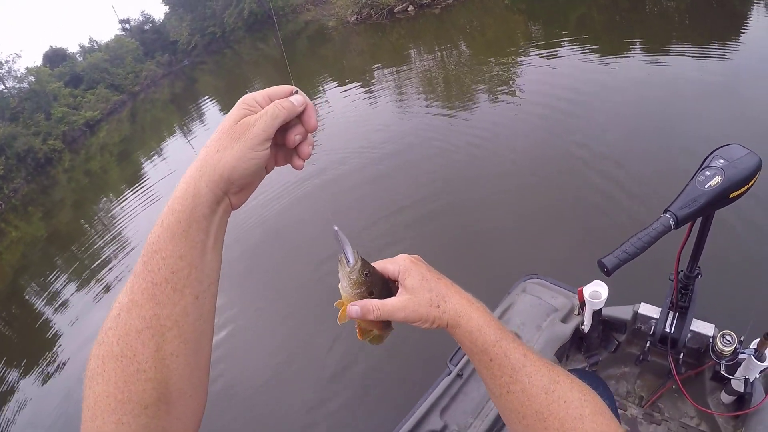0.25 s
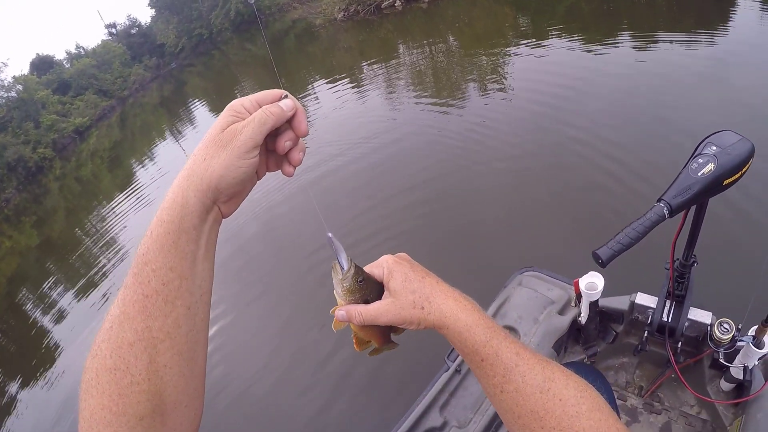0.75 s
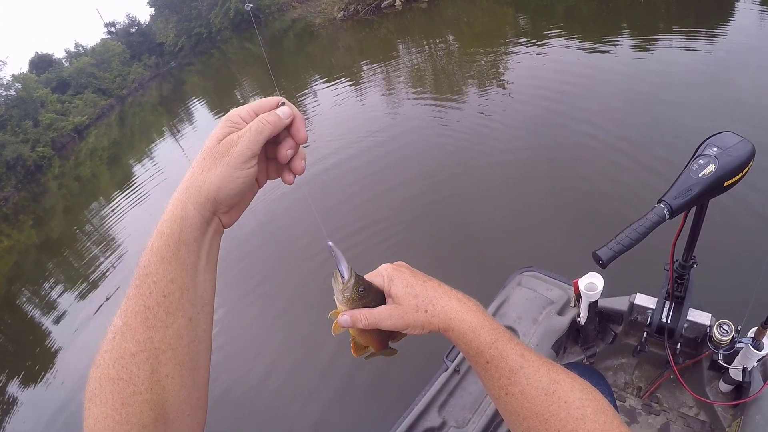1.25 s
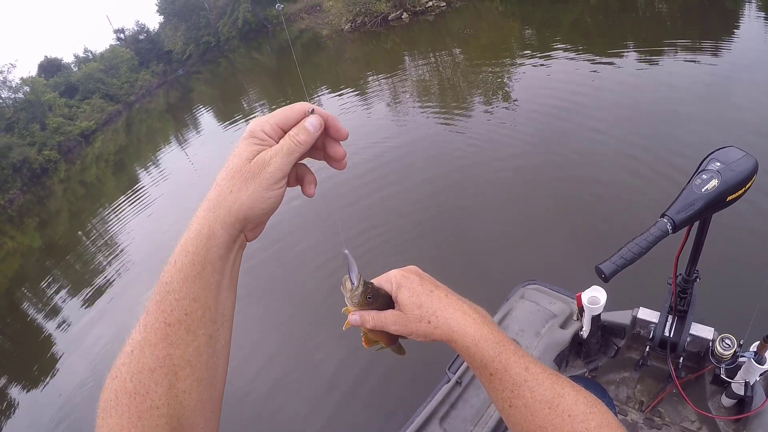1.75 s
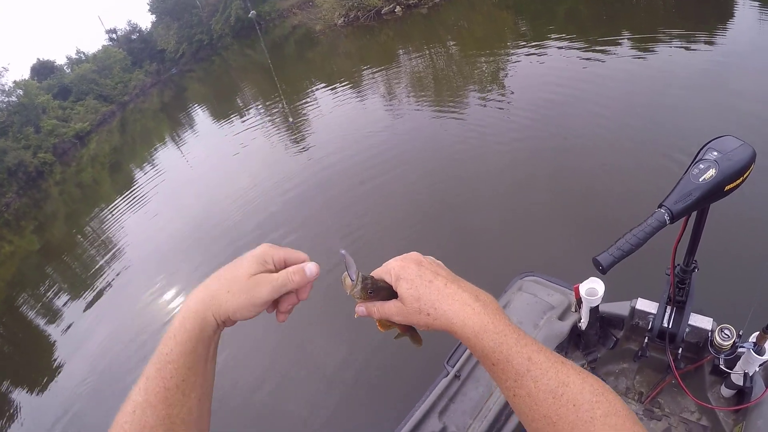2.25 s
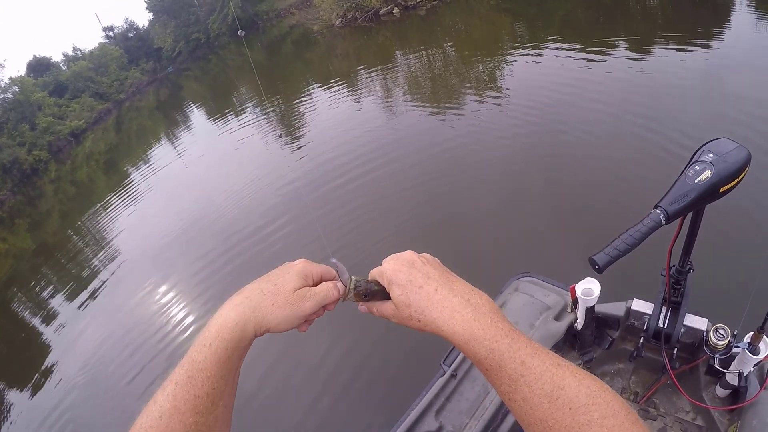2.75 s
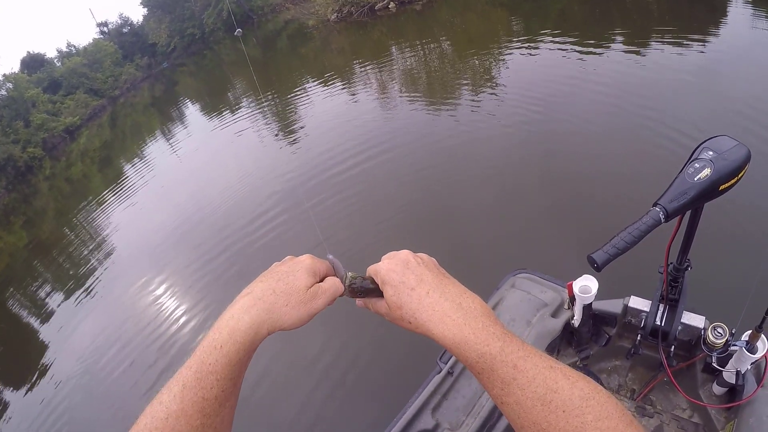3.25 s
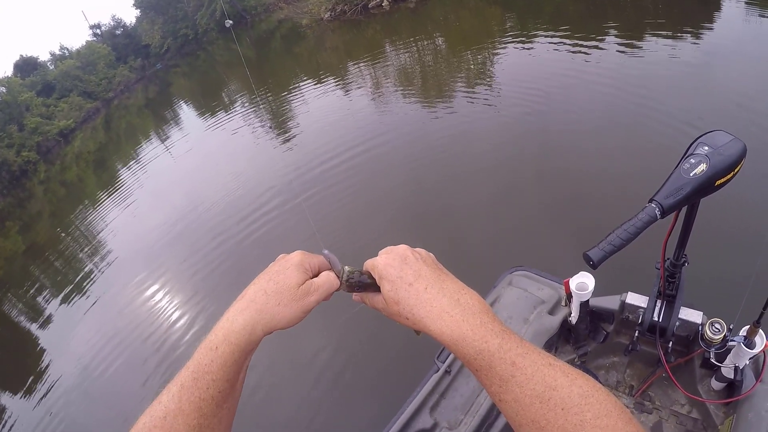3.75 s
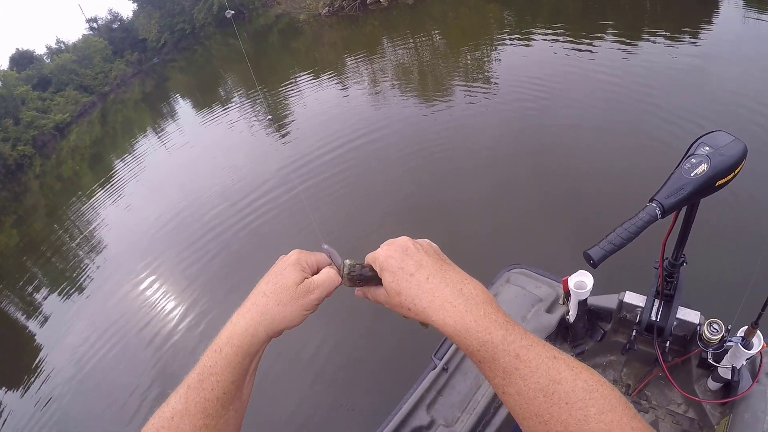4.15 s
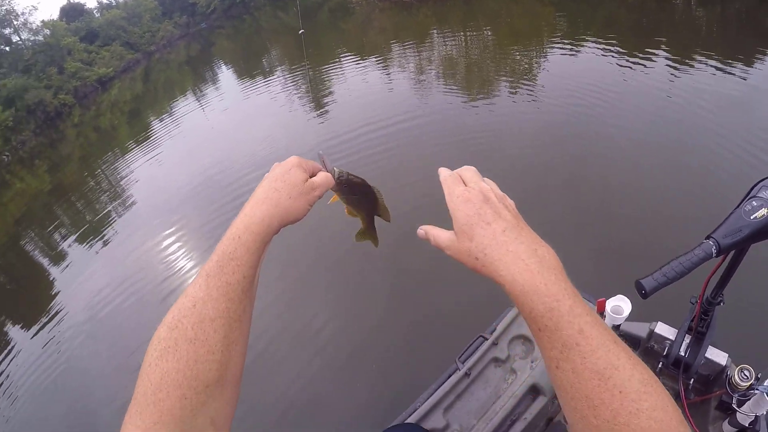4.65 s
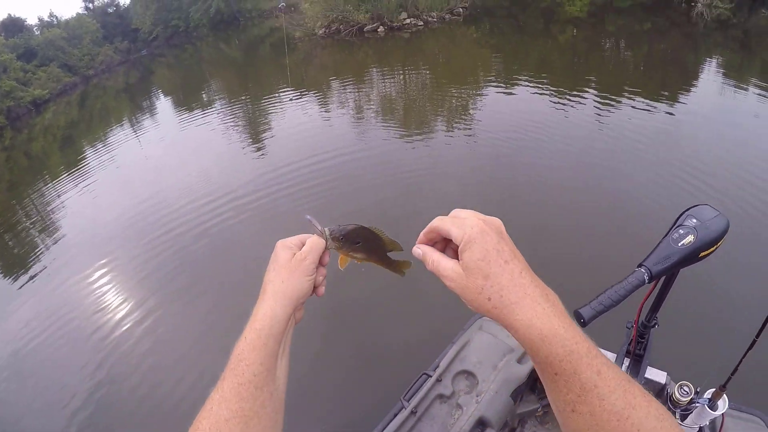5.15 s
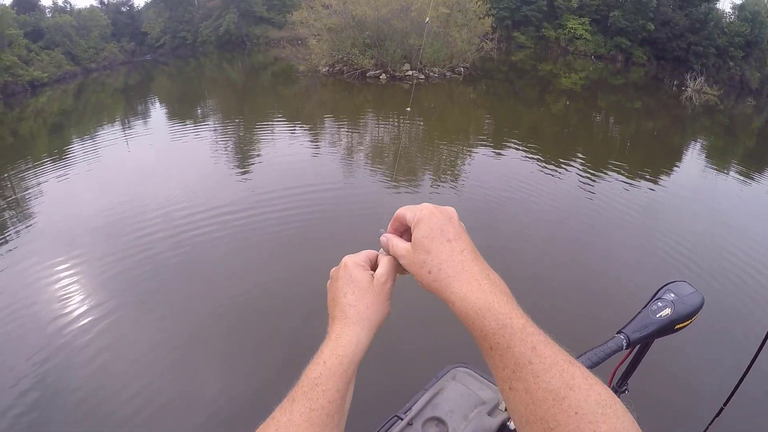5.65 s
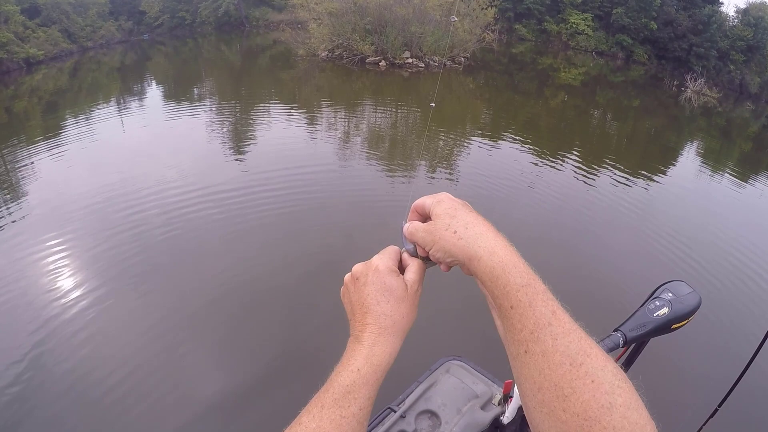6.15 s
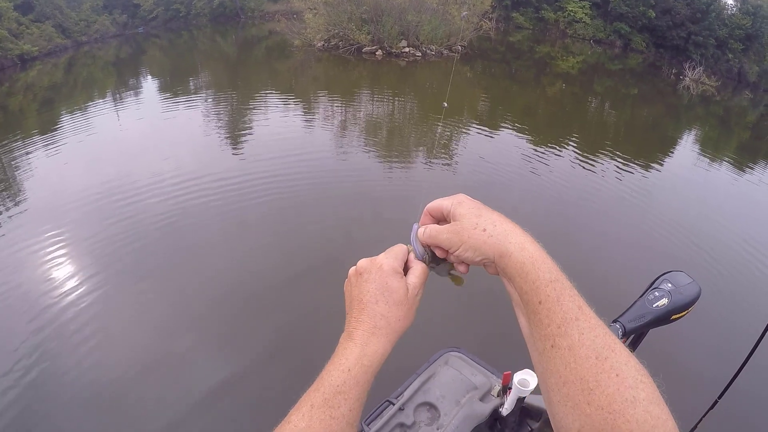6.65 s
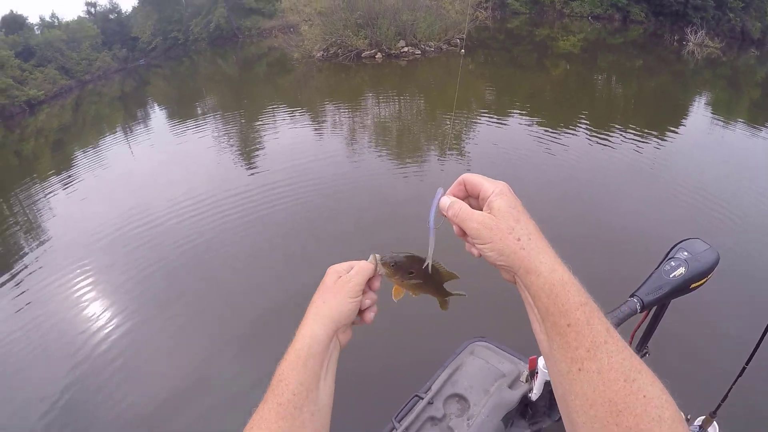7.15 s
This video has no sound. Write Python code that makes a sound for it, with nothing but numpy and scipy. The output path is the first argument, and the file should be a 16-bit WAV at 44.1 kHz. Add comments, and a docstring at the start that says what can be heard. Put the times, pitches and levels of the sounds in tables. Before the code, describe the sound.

On a still river, a shimmering high insect chorus and constant bass rumble surround sparse tackle clicks, soft wet pats and faint birdsong.

```python
"""A still river in summer, heard from a small boat: a steady drone of cicadas in the bank trees.
Dense random clicks excite the cicadas' body resonances; filtered noise gives a far low rumble and hiss.
Wet hands on a fish, hook and tackle pat, click and rub as decaying rings, noise snaps and soft grains.
Distant birds whistle and chip as gliding sines, and a hoarse call is a tone broken up by narrow noise.
A small camera adds steady tones and a wavering whine built from three harmonics."""
import sys
import numpy as np
from scipy import signal
from scipy.fft import rfft, irfft, next_fast_len
from scipy.io import wavfile

SR = 44100
rng = np.random.default_rng(int(sys.argv[2]) if len(sys.argv) > 2 else 0)


def level_to_linear(level):
    """Convert decibel levels to linear amplitude factors, elementwise."""
    exponent = np.asarray(level, float) / 20
    return 10 ** exponent


def store_wav(level_fs):
    """Save 16-bit WAV to argv[1]."""
    pcm = np.round(np.clip(np.atleast_2d(level_fs), -1, 1) * 32767)
    wavfile.write(sys.argv[1], SR, pcm.T.astype(np.int16))


N = 325458

# Levels in the tables apply ahead of echoes and of the sensitivity of the microphone ports.
# Cicada crowds, each tuned alike: f/Hz, width of one resonance/Hz, level/dB, left minus right/dB
CICADA_CROWDS = [(5246, 570, -58, -5), (5520, 1180, -52, -1.5), (6250, 810, -47.5, 1),
                 (6600, 600, -48, -2.5), (7060, 540, -61.5, 17.5), (7650, 1530, -61, 3.5)]
# Hard clicks of hook and tackle: t/s, level/dB, ring f/Hz, snap relative to ring/dB
TACKLE_CLICKS = [(0.0371, -27, 2700, 4), (.0603, -31, 1280, -1), (4.3856, -31, 1680, -10),
                 (4.587, -35, 2230, -1), (5.8262, -42, 1370, -4), (6.1128, -34.5, 1440, 10),
                 (6.3924, -33, 3300, -2), (6.4033, -32, 3230, 2), (6.4094, -31, 3080, -1),
                 (6.419, -16.5, 1970, 1), (6.4391, -20, 3280, 8), (7.068, -35, 1360, 1),
                 (7.214, -37, 1400, 8), (7.257, -37, 1400, 8)]
# Soft pats of wet hands on the fish: t/s, level/dB, ring f/Hz, decay time T60/s
HAND_PATS = [(1.367, -40, 650, 0.015), (1.652, -38, 797, 0.014), (2.359, -42, 423, 0.048),
             (2.397, -39, 398, 0.051), (2.866, -37.5, 1160, 0.031), (4.429, -35, 940, .02),
             (4.732, -40.5, 618, 0.09), (5.499, -39, 1050, .02), (5.752, -43, 848, 0.04),
             (6.848, -37, 668, 0.023)]
# Bouts of hand movement: start t/s, length/s, level/dB
RUBBING_BOUTS = [(2.355, 0.049, -56.5), (4.327, 0.17, -57.5), (4.693, 0.16, -58), (5.05, 0.56, -59),
                 (5.833, 0.19, -54), (6.097, 0.37, -62)]
# Level notes of a songbird that sings its phrase twice: start t/s, length/s, start f/Hz, start level/dB
SONG_NOTES = [(2.172, 0.13, 3726, -48.5), (2.29, 0.031, 3070, -56), (2.345, .04, 3710, -61),
              (2.402, 0.05, 2326, -52.5), (2.477, 0.025, 2330, -54), (2.717, 0.11, 3745, -49),
              (2.84, 0.036, 3050, -60), (2.849, 0.044, 3670, -55), (2.903, 0.022, 2355, -54),
              (2.942, .065, 2340, -56.5), (3.012, 0.047, 2350, -62), (3.14, .04, 2335, -64)]
# Chips of a bird that sweeps downward: t/s, peak level/dB, length/s
DOWN_CHIPS = [(.41, -50, 0.028), (1.318, -52, .018), (2.176, -45, 0.027), (3.19, -49, .035),
              (4.362, -53, .018), (5.093, -42.5, 0.032)]
# Chips of a bird that sweeps upward: t/s, peak level/dB, length/s
RISING_CHIPS = [(.385, -40, 0.023), (4.904, -37, .024)]
# Slurred whistles of farther birds: start t/s, length/s, start f/Hz, end f/Hz, start level/dB
SLURRED_NOTES = [(.69, .1, 735, 715, -59), (1.535, .17, 3030, 2960, -55), (1.71, .2, 2830, 2520, -66),
                 (1.935, .05, 2980, 2920, -61), (4.98, .18, 2990, 2960, -60),
                 (5.155, .045, 2930, 2740, -62), (5.72, .26, 2830, 2930, -62), (5.82, .25, 3530, 3530, -67),
                 (6.05, .05, 2820, 2620, -61), (6.975, .115, 2960, 3050, -56), (7.21, .14, 3400, 3340, -63)]
# Hoarse far call: start t/s, length/s, top f/Hz, level at the top/dB
HOARSE_CALLS = [(5.11, 0.41, 1464, -60), (5.83, 0.28, 1514, -50.5)]
# Steady camera tones: f/Hz, rms level/dB
CAMERA_TONES = [(239.8, -75), (359.6, -68), (599.4, -81), (719.3, -73.5), (839.2, -73), (13667, -91)]
# Camera whine, first three harmonics between dips: rms level/dB
WHINE_HARMONICS = [-64, -67.5, -64.5]
# Shape of the rumble spectrum: f/Hz, relative level per Hz/dB
RUMBLE_SPECTRUM = [(7.1, -23), (12, -4.5), (43, 2.5), (65, 0.5), (117, -5.5), (150, -9.5), (173, -17.5),
                   (226, -17), (264, -25.5), (355, -28), (390, -34), (500, -54), (650, -86), (1100, -120)]
# Shape of the air and microphone hiss spectrum: f/Hz, relative level per Hz/dB
HISS_SPECTRUM = [(300, 1), (500, 0), (900, -1.5), (1500, -4), (2500, -5), (4000, -5.5), (6000, -3.5),
                 (9000, -8), (12000, -8), (14000, -8), (15000, -9.5), (15500, -23)]
# Likeness of left and right: f/Hz, correlation (0 to 1)
STEREO_LIKENESS = [(60, .99), (200, 0.99), (400, 0.69), (1000, 0.55), (3000, 0.57), (6800, 0.43),
                   (15000, 0.1)]

RUMBLE_DB, HISS_DB = -33.5, -52   # rms; the hiss drifts about its value
CLICK_T60_S, CLICK_BRIGHT_HZ = 0.0095, 3500
PAT_SNAP_DB, PAT_BRIGHT_HZ = -4, 1500
RUB_RISE_DB_PER_S, RUB_FALL_DB_PER_S = 248, 152
NOTE_ATTACK_S, NOTE_RELEASE_S = 0.017, 0.0057
SONG_SAG_PER_S, SONG_FADE_DB_PER_S = 0.196, 30   # share of the pitch, and level, lost along a note
DOWN_CHIP_HZ, DOWN_CHIP_HZ_PER_S = 8350, -23000
UP_CHIP_HZ, UP_CHIP_HZ_PER_S = 6410, 49000
SLUR_FADE_DB_PER_S, SLUR_ARCH = 25, 0.018   # the arch is a share of the pitch
SLUR_WAVER_HZ = 35   # spread for a note at 3000 Hz
HOARSE_ARCH, HOARSE_ARCH_DB = 0.1, 8.5   # share of pitch, and level, lost at both ends
HOARSE_TOP_AT = 0.45   # place of the top along the call, 0 to 1
WHINE_HZ, FRAME_HZ = 4766, 60000 / 1001


def rms_one(x):
    """Normalization: division by the root mean square gives unit power."""
    return x / np.sqrt(np.mean(x ** 2) + 1e-20)


def at_hz(points, hz):
    """Linear interpolation of a spectrum on a logarithmic frequency axis."""
    table_hz, values = np.array(points).T
    return np.interp(np.log(hz), np.log(table_hz), values)


def drift(rate_hz):
    """Slow random fluctuation: white noise through two equal one-pole low-passes, at unit spread."""
    slow_sr = SR / 20
    r = np.exp(-2 * np.pi * rate_hz / slow_sr)
    noise = rng.standard_normal(N // 20 + 4002)
    slow = signal.lfilter([1], [1, -2 * r, r * r], noise)[4000:]   # without the run-in
    return np.interp(np.arange(N) / 20, np.arange(len(slow)), rms_one(slow - slow.mean()))


def resonance(x, hz, width_hz):
    """Two-pole resonance: pole radius sets the bandwidth, pole angle the pitch; unit gain at the top."""
    r = np.exp(-np.pi * width_hz / SR)
    poles = [1, -2 * r * np.cos(2 * np.pi * hz / SR), r * r]
    return signal.lfilter([(1 - r * r) / 2, 0, (r * r - 1) / 2], poles, x)


def pair(shared, apart, alike):
    """Interaural correlation: a shared and an opposed part are weighted to give the wanted likeness."""
    opposed = apart * np.array([[1], [-1]])
    return (np.sqrt(1 + alike) * shared + np.sqrt(1 - alike) * opposed) / np.sqrt(2)


def coloured(spectrum):
    """Spectral shaping: white noise weighted in frequency, silent outside the spectrum, at unit power."""
    size = next_fast_len(N)
    hz = np.maximum(np.arange(size // 2 + 1) * SR / size, 1)
    inside = (hz > spectrum[0][0]) * (hz < spectrum[-1][0])
    gain = level_to_linear(at_hz(spectrum, hz)) * inside
    shared, apart = rfft(rng.standard_normal((2, size))) * gain
    alike = np.clip(at_hz(STEREO_LIKENESS, hz), 0, 1)
    return rms_one(irfft(pair(shared, apart, alike), size)[:, :N])


def leaves_echo(x, wet_db, t60):
    """Diffuse reverberation: trees and water return a smear of noise that decays exponentially."""
    t = np.arange(round(t60 * SR)) / SR
    noise = rng.standard_normal((2, len(t)))
    tail = noise * level_to_linear(-60 * t / t60) * (t > 0.008)   # first return after 8 ms
    tail = tail / np.sqrt(np.sum(tail ** 2, axis=1, keepdims=True))
    return x + level_to_linear(wet_db) * signal.fftconvolve(x[None], tail, axes=1)[:, :N]


def cicadas(clicks_per_s, waver_db):
    """Superposition of resonant impulses: tymbal clicks blur into a drone at each crowd's pitch."""
    out = 0
    for hz, width_hz, level_db, pan_db in CICADA_CROWDS:
        clicks = (rng.random((2, N)) < clicks_per_s / SR) * rng.standard_normal((2, N))
        song = clicks
        for _ in range(3):   # body of the insect, steep skirts
            song = resonance(song, hz, width_hz)
        waver = waver_db * (drift(5.8) + 0.5 * drift(25))
        lean = pan_db * np.array([[0.5], [-0.5]])
        alike = np.clip(at_hz(STEREO_LIKENESS, hz), 0, 1)
        crowd = pair(*rms_one(song), alike) * np.sqrt(2)   # 3 dB above the tabled level
        out = out + level_to_linear(level_db + waver + lean) * crowd
    return out


def knocks(rows, bright_hz):
    """Damped free vibration: each touch is a decaying ring with a low-passed noise snap on top."""
    out, t = np.zeros(N), np.arange(2000) / SR
    cracks = rng.standard_normal((len(rows), len(t)))
    rise = np.clip((t - 0.0008) / 0.0002, 0, 1)
    dull = np.exp(-2 * np.pi * bright_hz / SR)
    for (s, level_db, hz, t60, snap_db), crack in zip(rows, cracks):
        ring = np.sin(2 * np.pi * hz * t) * level_to_linear(-60 * t / t60)
        noise = rms_one(signal.lfilter([1], [1, -dull], crack))
        snap = level_to_linear(snap_db) * noise * level_to_linear(-60 * t / np.minimum(t60, 0.006))
        out[round(s * SR) + np.arange(len(t))] += level_to_linear(level_db) * rise * (ring + snap)
    return out


def hands():
    """Contact excitation: soft pats snap dull, hard clicks of hook and tackle ring short and snap bright."""
    pats = [(s, level_db, hz, t60, PAT_SNAP_DB) for s, level_db, hz, t60 in HAND_PATS]
    clicks = [(s, level_db, hz, CLICK_T60_S, snap_db) for s, level_db, hz, snap_db in TACKLE_CLICKS]
    return knocks(pats, PAT_BRIGHT_HZ) + knocks(clicks, CLICK_BRIGHT_HZ)


def rustle(grains_per_s):
    """Granular friction: wet hands rub in clumped soft grains, band-passed, swelling with each bout."""
    clumping = level_to_linear(3 * drift(15))
    grains = (rng.random(N) < grains_per_s * clumping / SR) * rng.standard_normal(N)
    dull_band = signal.butter(2, [350, 1600], "band", fs=SR, output="sos")
    band = signal.sosfilt(dull_band, grains)
    t = np.arange(N) / SR
    bouts = np.zeros(N)
    for s, length, level_db in RUBBING_BOUTS:
        before = RUB_RISE_DB_PER_S * np.maximum(s - t, 0)
        after = RUB_FALL_DB_PER_S * np.maximum(t - s - length, 0)
        bouts += level_to_linear(level_db - before - after)
    return bouts * rms_one(band)


def whistles(notes, fade_db_per_s, arch, waver_hz, flutter_db):
    """Frequency modulation: near sines glide over an arch, made unsteady on their way through the air."""
    out = np.zeros(N)
    flutter = level_to_linear(flutter_db * drift(35))
    waver = waver_hz * drift(45)
    for s, length, start_hz, end_hz, level_db in notes:
        t = np.arange(round(length * SR)) / SR
        at = round(s * SR) + np.arange(len(t))
        edges = np.clip(np.minimum(t / NOTE_ATTACK_S, (length - t) / NOTE_RELEASE_S), 0, 1)
        glide = start_hz + (end_hz - start_hz) * t / length
        pitch = glide * (1 + arch * np.sin(np.pi * t / length)) + waver[at] * start_hz / 3000
        tone = np.sin(2 * np.pi * np.cumsum(pitch) / SR)
        out[at] += np.sqrt(2) * level_to_linear(level_db - fade_db_per_s * t) * edges * tone
    return out * flutter


def songbird():
    """Falling driving effort: every note sags a little in pitch and fades as the effort runs down."""
    notes = [(s, length, hz, hz * (1 - SONG_SAG_PER_S * length), level_db)
             for s, length, hz, level_db in SONG_NOTES]
    return whistles(notes, SONG_FADE_DB_PER_S, arch=0, waver_hz=5, flutter_db=1.2)


def chips(rows, start_hz, hz_per_s):
    """Linear frequency sweep: each chip is a short sine of steeply changing pitch."""
    out = np.zeros(N)
    for s, peak_db, length in rows:
        u = np.linspace(0, 1, round(length * SR))
        at = round(s * SR) + np.arange(len(u))
        sweep = np.sin(2 * np.pi * np.cumsum(start_hz + hz_per_s * length * u) / SR)
        out[at] += level_to_linear(peak_db) * np.sin(np.pi * u) ** 0.077 * sweep   # nearly flat envelope
    return out


def chipping_birds():
    """Opposite sweeps: one bird chips downward about once a second, another upward."""
    down = chips(DOWN_CHIPS, DOWN_CHIP_HZ, DOWN_CHIP_HZ_PER_S)
    return down + chips(RISING_CHIPS, UP_CHIP_HZ, UP_CHIP_HZ_PER_S)


def slurring_birds():
    """Gliding tones: farther birds slur their whistles, with strong flutter in the air."""
    return whistles(SLURRED_NOTES, SLUR_FADE_DB_PER_S, SLUR_ARCH, SLUR_WAVER_HZ, flutter_db=2.5)


def hoarse_call(width_hz, clear):
    """Noise modulation: an animal's tone arches with the effort, and narrow noise breaks it up."""
    out = np.zeros(N)
    rough = np.clip(clear, 0, 1) + drift(width_hz)
    for s, length, hz, level_db in HOARSE_CALLS:
        t = np.arange(round(length * SR)) / SR
        slack = np.interp(t / length, [0, HOARSE_TOP_AT, 1], [1, 0, 1]) ** 2
        edges = np.clip(np.minimum(t, length - t) / 0.014, 0, 1)
        tone = np.sin(2 * np.pi * np.cumsum(hz * (1 - HOARSE_ARCH * slack)) / SR)
        call = level_to_linear(level_db - HOARSE_ARCH_DB * slack) * edges * tone
        out[round(s * SR) + np.arange(len(t))] += call
    return out * rough


def camera(waver_hz, dip, dip_at):
    """Periodic modulation: steady tones, and a whine of wavering pitch that dips once a picture frame."""
    t = np.arange(N) / SR
    hum = sum(np.sqrt(2) * level_to_linear(level_db) * np.sin(2 * np.pi * hz * t) for hz, level_db in CAMERA_TONES)
    phase = 2 * np.pi * np.cumsum(WHINE_HZ + waver_hz * drift(147)) / SR
    whine = sum(np.sqrt(2) * level_to_linear(level_db) * np.sin(k * phase)
                for k, level_db in enumerate(WHINE_HARMONICS, start=1))
    frame_phase = 2 * np.pi * (FRAME_HZ * t - dip_at)   # dip_at is a share of the frame
    gate = 1 - np.clip(dip, 0, 1) * np.exp(2.0 * (np.cos(frame_phase) - 1))
    return hum + whine * gate


def far_rumble():
    """Low-frequency noise: a steady spectrum, strongest in the bass and nearly alike on both sides."""
    return level_to_linear(RUMBLE_DB) * coloured(RUMBLE_SPECTRUM)


def air_hiss():
    """Broadband noise: air and microphone hiss whose level drifts slowly."""
    return level_to_linear(HISS_DB + 0.94 * drift(1.84)) * coloured(HISS_SPECTRUM)


def scene():
    """Linear superposition: all sources add, with a longer and stronger echo for the farther birds."""
    drone = cicadas(clicks_per_s=6000, waver_db=-0.5)
    near = leaves_echo(hands() + rustle(grains_per_s=2500), wet_db=-16, t60=0.12)
    birds = leaves_echo(songbird() + chipping_birds(), wet_db=-6, t60=0.07)
    far_calls = slurring_birds() + hoarse_call(width_hz=120, clear=1.0)
    farther = leaves_echo(far_calls, wet_db=-3, t60=0.3)
    device = camera(waver_hz=46.3, dip=0.65, dip_at=0.39)
    return drone + near + birds + farther + device + far_rumble() + air_hiss()


def band_limit(x):
    """A steep low-pass at the top of the band."""
    return signal.sosfilt(signal.butter(12, 15730, fs=SR, output="sos"), x)


def record(dry):
    """Transducer response: the left port is a little less sensitive, and the top is cut steeply."""
    ports = dry * level_to_linear(np.array([[-0.9], [0.85]]))   # left, right
    top_cut = signal.ellip(8, 0.5, 30, 15150, fs=SR, output="sos")
    mix = signal.sosfilt(top_cut, ports)
    return band_limit(mix)


dry = scene()
out = record(dry)
store_wav(out)
```